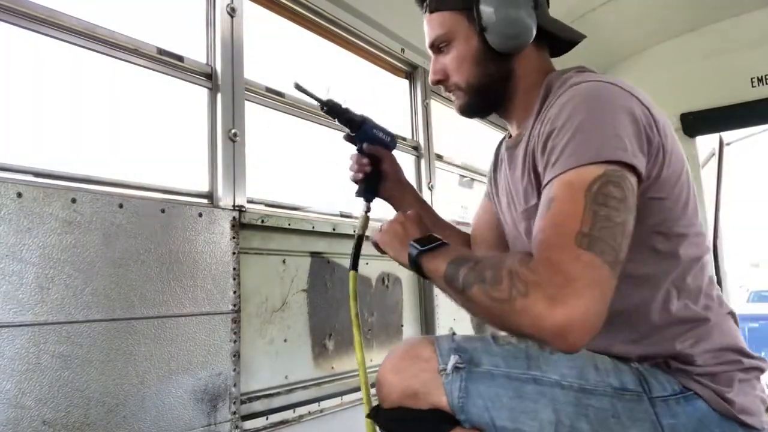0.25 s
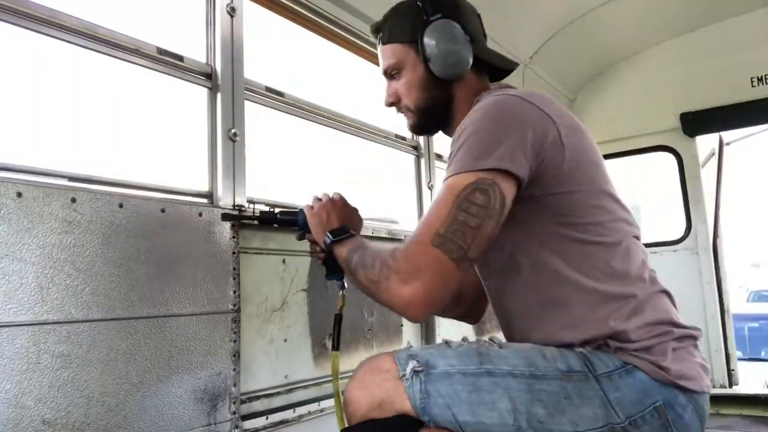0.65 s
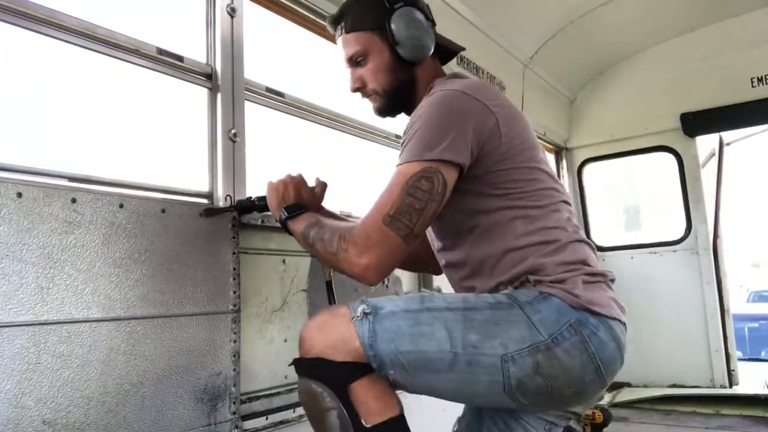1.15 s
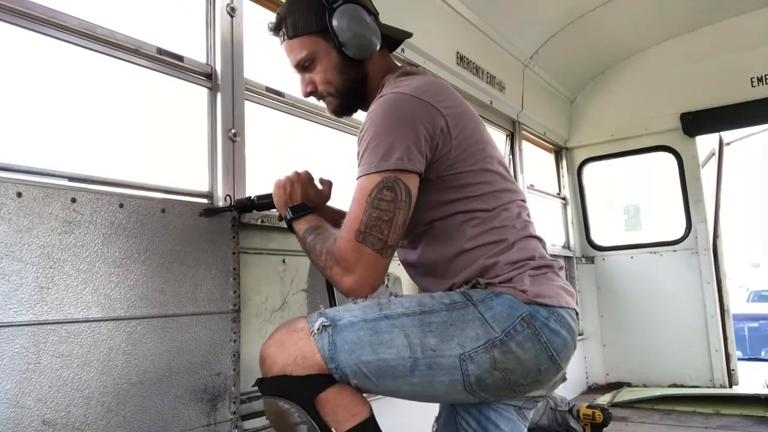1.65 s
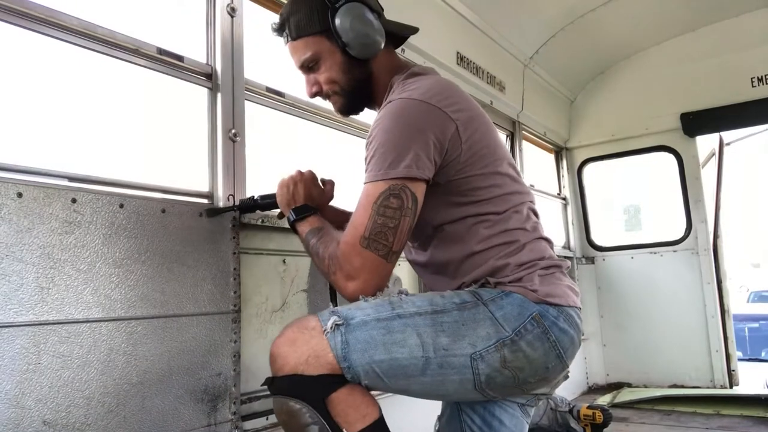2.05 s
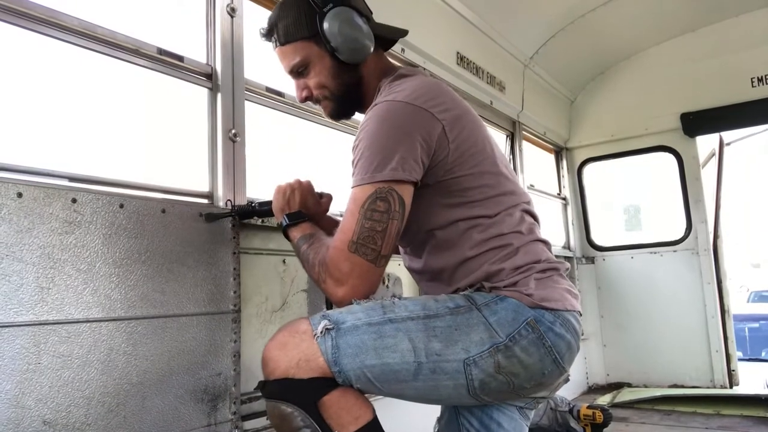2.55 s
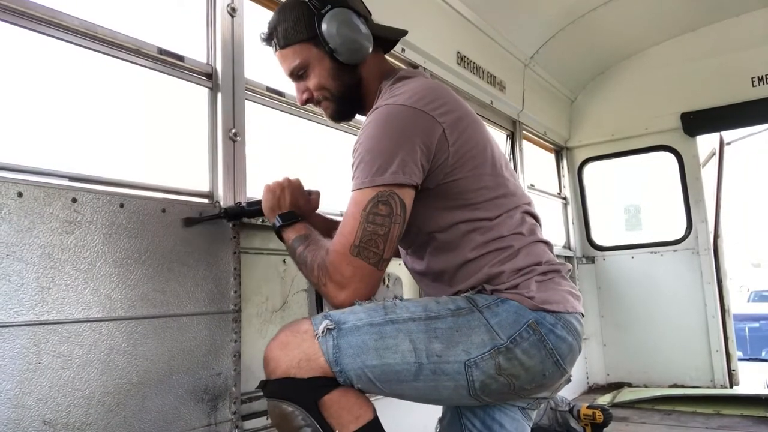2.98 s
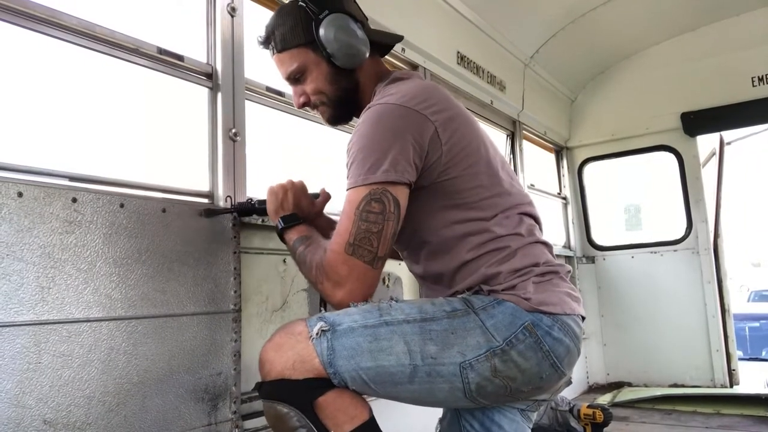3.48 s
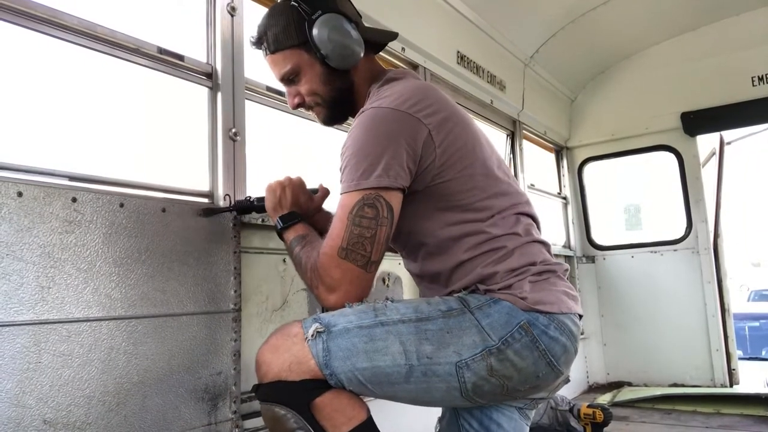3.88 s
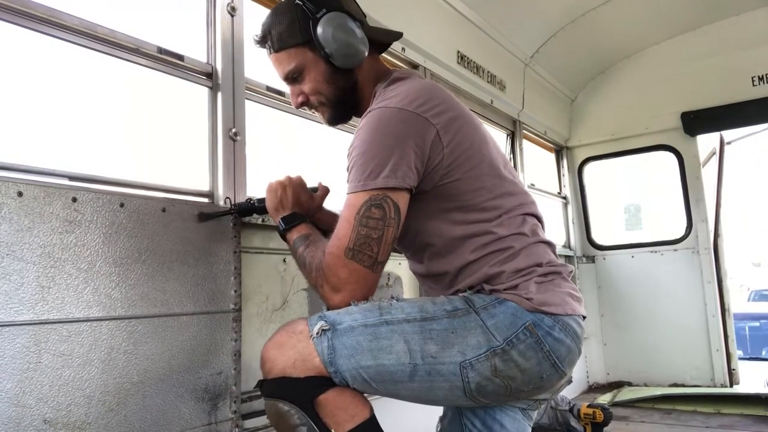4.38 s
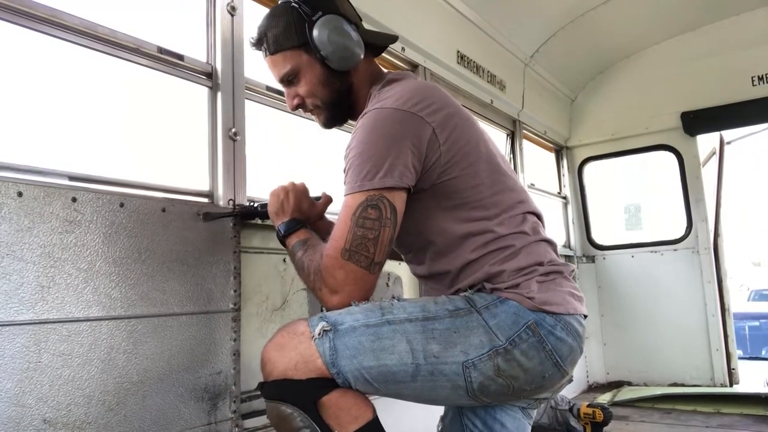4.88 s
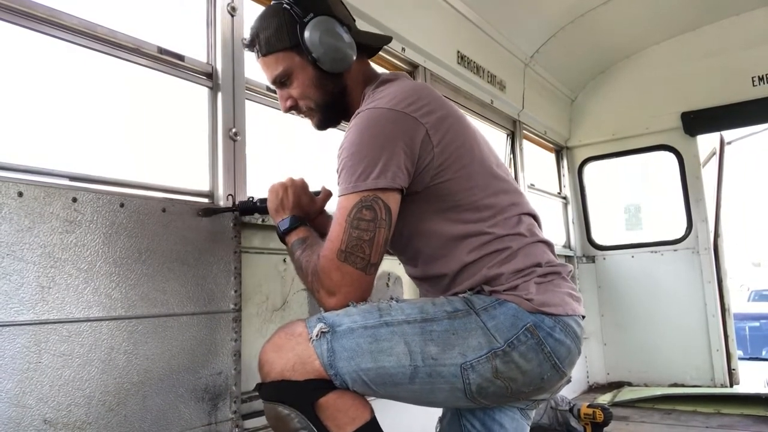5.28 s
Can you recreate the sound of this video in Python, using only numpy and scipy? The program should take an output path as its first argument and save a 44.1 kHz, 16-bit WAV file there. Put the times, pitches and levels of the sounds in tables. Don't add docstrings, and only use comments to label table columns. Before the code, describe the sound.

Quiet handling comes first: soft knocks, small metallic ticks, three clanks and thin air hiss. Then an air chisel hammers steel in six brief, very loud bursts, each blow a hard crack with sheet thud and exhaust puff. Occasional knocks fall in the gaps while bare cabin echoes and panel ringing decay. Close phone microphone with bass trimmed, quiet yard and distant traffic far beneath.

```python
import sys
import numpy as np
from scipy import signal
from scipy.fft import rfft, irfft
from scipy.io import wavfile
from scipy.ndimage import uniform_filter1d

SR = 44100
rng = np.random.default_rng(int(sys.argv[2]) if len(sys.argv) > 2 else 0)


def store_wav(level_fs):
    pcm = np.round(np.clip(np.atleast_2d(level_fs), -1, 1) * 32767)
    wavfile.write(sys.argv[1], SR, pcm.T.astype(np.int16))


def convert_level_to_amplitude(level_db):
    exponent = np.asarray(level_db, float) / 20
    return 10 ** exponent


N = 243873
T = np.arange(N) / SR

# first blow t/s, stroke/ms, blows, crack level/dB, sag/dB per blow
BURSTS = [
    (1.8772, 22., 1, -8, 0),
    (1.902, 18.4, 9.63, -8.5, 0.28),
    (2.9147, 20.75, 8, -5.5, 0),
    (3.0777, 25.3, 2, -12, 1),
    (3.766, 21.5, 10, -3, -0.18),
    (4.2075, 21.3, 9.82, -2, 0.26),
    (4.8108, 20.8, 12, -2, 0),
    (5.0796, 18, 1.4, -8, 3),
    (5.5104, 16.8, 2.26, -1, -3),
]
# thud level/dB, thud drift/dB per blow, exhaust level/dB,
# snap level/dB, snap drift/dB per blow
BIT_GRIP = [(-1, 0, -30, 2, 0), (-4.5, 1., -9.5, -3.5, 0), (-1.5, -0.42, -7.5, 2, 0.9), (-7.5, 4, -7, 3, 4),
            (-3, 0, -6, 4, -3), (-3, -0.08, -8.5, 0.5, -0.46), (-3, 0, -8, 2.5, -0.24), (1, 0, -2.5, 7, 0),
            (.5, -3.5, -2.5, 1, -1)]
STROKE_JITTER_MS, BLOW_SCATTER_DB = 0.9, 1.3
LAST_BLOW_DB, BEFORE_LAST_DB = -3.5, -0.5
STARTLE_DB, STARTLE_MS = 6, 12
# peak t/s, level/dB, swell/dB per ms, fade/dB per ms
PUFFS = [
    (1.854, -8, 5, 3.5),
    (1.866, -6.5, 8.5, 3),
    (2.898, -27, 14.5, 1),
    (2.904, -17, 3, 1.5),
    (3.745, -35.5, 11.5, 1.5),
    (3.756, -17.5, 3, 1),
    (4.201, -27, 2.5, 1.5),
    (4.789, -20.5, 6, 1.5),
    (4.802, -18.5, 3.5, 2),
    (5.5, -22, 3.5, 0.7),
]
# f/Hz, level/dB per Hz
BLOW_COLOUR = [(59, -59.5), (100, -29.5), (134, -10), (270, -8), (333, -6), (448, -4.5), (642, -6.5),
               (845, -6.5), (2010, -11.5), (3270, -7.5), (5900, -15), (9200, -14.5), (15600, -23.5)]
# f/Hz, level/dB per Hz
AIR_COLOUR = [(240, -45.5), (400, -9), (1520, -13), (2160, 1.5), (4940, -2.5), (7030, 2.5), (7950, 2.5),
              (14700, -1.5), (15600, 0)]
SPLIT_HZ = 990
# f/Hz, t60/s, level/dB
WALL_MODES = [(140.6, 0.4, -25), (223, .15, -28), (269, 0.43, -26), (404, 0.51, -25.5), (455.2, 0.29, -23),
              (500., 0.13, -25.5), (558.3, 0.11, -19), (672, 0.021, -22.5), (875.6, 0.087, -21),
              (980, 0.025, -21.5), (2710, 0.03, -26), (3192, 0.008, -20.5), (3665, 0.028, -26.5),
              (9200, .005, -24)]
# f/Hz, t60/s, level/dB
ROOF_MODES = [(133.7, 4.1, -34.5), (165, 4.8, -35.5), (292, 2.4, -38), (344, 4.5, -33), (590, 3.3, -42.5),
              (937., 1.6, -39), (1246, 1.6, -40), (1324, 1.8, -40), (1503, 2.4, -37.5),
              (1588., 3., -45), (1610., 2.5, -48)]

# t/s, sheet level/dB, sheet f/Hz, sheet width/octaves, rattle level/dB
CLANKS = [
    (.541, -29.5, 579, 1, -53),
    (.888, -25.5, 900, 1.6, -28),
    (1.12, -26.5, 520, 2.8, -35),
]
# delay/s, level over its source/dB, centre (share of sheet f, or f/Hz),
# width (share of sheet width, or octaves), contact/ms
STRIKE, SHEET = (0, 8.5, 1.12, 1.1, 11.0), (0.003, 0.5, 0.94, 0.93, 37.4)
RATTLE, CRACK = (0.03, -2, 3400.0, 2.5, 39), (0, 10.5, 2200.0, 2.1, 4.5)
# t/s, level/dB, centre f/Hz, width/octaves
TICKS = [(.232, -35, 1950, 3.), (.33, -45, 3500, 0.22), (.34, -40, 7000, 2.27), (.568, -45.5, 6500, .5),
         (.726, -45, 6000, 2.5), (.829, -38, 2360, 0.81), (.914, -39, 7500, .8), (.94, -38, 13000, .71),
         (.944, -28, 3530, .3), (.968, -25.5, 7010, 0.36), (1.213, -36, 3030, 3.), (1.22, -45, 12000, 1.),
         (1.627, -44, 12000, .8), (1.634, -42.5, 11000, 1.), (1.705, -40.5, 5000, 2.),
         (1.711, -34.5, 9520, 1.), (3.449, -35, 2680, 1.4), (3.682, -40, 890, 1.9)]
TICK_MS_AT_1K, TICK_SLOPE = 12.0, 0.62
# t/s, level/dB, centre f/Hz, width/octaves, contact/ms
THUDS = [(.071, -41, 396, 1.1, 60), (.171, -37.5, 303, 0.57, 20.), (.3, -50, 60, 2., 97),
         (.388, -39.5, 420, 1.4, 20), (.559, -34, 165, 1.4, 70), (.83, -40.5, 700, 1.3, 10),
         (.912, -32, 230, 2.8, 155), (1.15, -22.5, 156, 1.18, 66), (1.862, -21.5, 135, 0.96, 28),
         (2.05, -29.5, 120, 2., 61), (3.05, -26.5, 109.8, 1.7, 74), (1.865, -15, 500, 2., 12),
         (2.17, -43, 70, 1.5, 80), (2.29, -36.5, 250, 3.3, 29), (3.2, -39, 89, 1.1, 34),
         (3.279, -36, 2983, 3, 30.), (3.29, -32.5, 229, 3.1, 80), (3.455, -44, 1510, 0.16, 58),
         (3.46, -38.5, 382, 2.75, 79), (3.55, -47, 110, 1.6, 60.), (5.27, -43, 128, 0.41, 130)]

# peak t/s, rumble level/dB, hiss level/dB,
# swell/dB per s, fade/dB per s
SHIFTS = [
    (0., -44.5, -54, 400, 303),
    (.068, -45, -65, 900, 118),
    (0.211, -38.5, -41.5, 700, 120),
    (.402, -40, -76, 300, 170),
    (1.3, -44, -64.5, 301, 110),
    (1.474, -55, -77.5, 299.5, 200.5),
    (1.555, -53.5, -51, 401, 41.5),
    (1.6, -53.5, -48.5, 220, 220),
    (1.724, -51.5, -58, 300.5, 25.5),
    (1.84, -47, -58, 900, 900),
]
# f/Hz, level/dB per Hz
RUMBLE_COLOUR = [(15, -59), (25, -23), (134, -15), (156, -9), (275, -11.5), (555, -20), (694, -19),
                 (1500, -46), (1950, -72.5), (3300, -120)]
# f/Hz, level/dB per Hz
HISS_COLOUR = [(410, -32.5), (700, -4.5), (1090, -6), (1190, -4), (1380, -7.5), (1720, -6.5), (6880, -13),
               (15600, -21)]
# start t/s, end t/s, f/Hz, width/Hz, level/dB
WHISTLES = [
    (0., .17, 6500., 50., -66),
    (.28, .4, 7900., 70., -69),
    (.655, .885, 3580., 35., -63.5),
    (1.42, 1.55, 3420., 60., -65),
    (1.42, 1.54, 2500., 60., -68),
    (1.72, 1.8, 7900., 80., -68),
]

# f/Hz, early t60/s, late t60/s, late share level/dB
CABIN = [(60., 0.13, 0.39, -19.5), (250., 0.3, 1.03, -4.5), (1000., 0.43, 1.09, -14),
         (4030, 0.39, 0.79, -7.5), (12000., 0.32, 0.66, -19.5)]
CABIN_DB = -3.5
# f/Hz, level/dB per Hz
YARD_COLOUR = [(25, -12.5), (60, -8.5), (156, -1), (340, -8), (600, -20), (1500, -21.5), (3300, -22),
               (5000, -27), (6500, -46), (15600, -74.5)]
YARD_DB = -60.5
# t/s, level/dB
YARD_GAIN = [(0., 3.5), (1.85, 3), (2.4, 0), (2.9, -2), (3.3, 4), (5.5, 0.5)]
# f/Hz, level/dB per Hz
TRAFFIC_COLOUR = [(20, -7.5), (40, 1), (70, -0.5), (140, -36.5)]
MIC_LOW_HZ, MIC_TOP_HZ = 55.0, 15600


def coloured(points):
    hz, db = np.transpose(points)
    f = np.maximum(np.arange(N // 2 + 1) * SR / N, 1)
    gain = convert_level_to_amplitude(np.interp(np.log(f), np.log(hz), db))
    x = irfft(rfft(rng.standard_normal(N)) * gain, N)
    return x / x.std()


def band_noise(low_high_hz, shape):
    band = signal.butter(2, low_high_hz, "band", fs=SR, output="sos")
    return signal.sosfilt(band, rng.standard_normal(shape))


def contact(s, db, swell_db_ms, fade_db_ms):
    i = np.arange(max(int((s - 0.05) * SR), 0), min(int((s + 0.3) * SR), N))
    ms = 1000 * (T[i] - s)
    env = np.zeros(N)
    env[i] = convert_level_to_amplitude(db + np.where(ms < 0, swell_db_ms * ms, -fade_db_ms * ms))
    return env


def ring(x, modes):
    out = 0
    for hz, t60, db in modes:
        r = 1000.0 ** (-1 / (t60 * SR))
        w = 2 * np.pi * hz / SR
        level = convert_level_to_amplitude(db) * 2 * np.sqrt(1 - r) * np.sin(w)
        out = out + level * signal.lfilter([1], [1, -2 * r * np.cos(w), r * r], x)
    return out


def flutter(rate_hz, depth_db):
    k = int(SR / rate_hz)
    steps = np.repeat(rng.standard_normal(N // k + 1), k)
    return convert_level_to_amplitude(depth_db * uniform_filter1d(steps, k)[:N])


def strokes():
    rows = []
    for burst, grip in zip(BURSTS, BIT_GRIP):
        s, ms, count, db, sag_db = burst
        thud_db, thud_drift, exhaust_db, snap_db, snap_drift = grip
        k = np.arange(round(count))
        chance = rng.standard_normal((len(k), 2)) * (k > 0)[:, None]
        at = s + (k * ms + STROKE_JITTER_MS * chance[:, 0]) / 1000
        closing = (k > 0) * np.where(k == k[-1], LAST_BLOW_DB, (k == k[-1] - 1) * BEFORE_LAST_DB)
        startle = STARTLE_DB * np.exp(-1000 * (at - BURSTS[0][0]) / STARTLE_MS)
        crack_db = db - sag_db * k + closing + startle + BLOW_SCATTER_DB * chance[:, 1]
        rows += zip(at, crack_db, thud_db + thud_drift * k, exhaust_db + 0 * k, snap_db + snap_drift * k)
    return rows


def hammer():
    hits = strokes()
    stroke = sum(contact(at + 0.001, db - 7, 14.0, 1.35) for at, db, *_ in hits)
    crack = uniform_filter1d(stroke, size=SR // 400)
    thud = sum(contact(at + 0.00266, db + own - 9.5, 6.6, 0.88) for at, db, own, _, _ in hits)
    exhaust = sum(contact(at + 0.011, db + own - 10.5, 5.3, 1.18) for at, db, _, own, _ in hits)
    snap = sum(contact(at + 0.0013, db + own - 14.5, 14.0, 3.1) for at, db, _, _, own in hits)
    puffs = sum(contact(at, db + 4, up, down) for at, db, up, down in PUFFS)

    steel = coloured(BLOW_COLOUR)
    low = signal.sosfilt(signal.butter(1, SPLIT_HZ, fs=SR, output="sos"), steel)
    high = steel - low
    blows = high / high.std() * crack * flutter(900, 2.5) + low / low.std() * thud
    air = coloured(AIR_COLOUR) * (exhaust + snap + uniform_filter1d(puffs, size=SR // 600))
    port = ring(rng.standard_normal(N) * puffs, [(2270.0, 0.012, -11.5)])
    push = rng.standard_normal(N) * (crack + thud)
    near = port + blows + ring(push, WALL_MODES) + air
    return near, ring(push, ROOF_MODES)


def clank_contacts():
    rows = []
    for s, sheet_db, sheet_hz, wide, rattle_db in CLANKS:
        parts = [(STRIKE, sheet_db, sheet_hz, wide), (SHEET, sheet_db, sheet_hz, wide),
                 (RATTLE, rattle_db, 1, 1), (CRACK, rattle_db, 1, 1)]
        for (delay, over_db, centre, width, ms), db, unit, span in parts:
            rows.append((s + delay, db + over_db, unit * centre, span * width, ms))
    return rows


def knocks():
    ticks = [(s, db, hz, octaves, TICK_MS_AT_1K * (1000 / hz) ** TICK_SLOPE) for s, db, hz, octaves in TICKS]
    out = 0
    for s, db, hz, octaves, ms in THUDS + ticks + clank_contacts():
        edges = np.clip([hz * 2 ** (-octaves / 2), hz * 2 ** (octaves / 2)], 20, 20000)
        x = band_noise(edges, N)
        out = out + x / x.std() * contact(s + 0.002, db - 4, 16.0, 8.7 / ms)
    return out


def scuffs():
    low, high = 0, 0
    for s, low_db, high_db, up, down in SHIFTS:
        drag = convert_level_to_amplitude(np.where(T < s, up * (T - s), down * (s - T)))
        low = low + drag * convert_level_to_amplitude(low_db - 5.0)
        high = high + drag * convert_level_to_amplitude(high_db - 3.5)
    rumble = coloured(RUMBLE_COLOUR) * low * flutter(26, 1.3)
    hiss = coloured(HISS_COLOUR) * high * flutter(70, 2.5)
    return rumble + hiss


def whistles():
    out = 0
    for start, end, hz, width_hz, db in WHISTLES:
        x = signal.lfilter(*signal.iirpeak(hz, hz / width_hz, fs=SR), rng.standard_normal(N))
        fade = np.interp(T, [start - 0.01, start, end, end + 0.026], [0, 1, 1, 0])
        out = out + x / x.std() * convert_level_to_amplitude(db) * fade
    return out


def cabin(x, count=4):
    t = T[:int(1.6 * SR)]
    table_hz, *columns = np.transpose(CABIN)
    echo = 0
    for hz in 40 * 2 ** np.arange(0, 9, 0.5):
        early, late, late_db = (np.interp(np.log(hz), np.log(table_hz), column) for column in columns)
        fall = convert_level_to_amplitude(-60 * t / early) / np.sqrt(early)
        fall = fall + convert_level_to_amplitude(late_db - 60 * t / late) / np.sqrt(late)
        echo = echo + band_noise([hz / 2 ** 0.25, hz * 2 ** 0.25], (count, len(t))) * fall
    echo = echo * np.minimum(t / 0.0078, 1) * np.sqrt(2 * np.log(1000) / SR)
    turns = np.outer(rng.uniform(5, 15, count), T) + rng.random((count, 1))
    spot = np.cos(2 * np.pi * turns)
    spot = spot / np.sqrt(np.sum(spot ** 2, axis=0))
    return signal.fftconvolve(x * spot, echo, axes=1)[:, :N].sum(axis=0)


def yard():
    gain_db = np.interp(T, *np.transpose(YARD_GAIN))
    return coloured(YARD_COLOUR) * convert_level_to_amplitude(YARD_DB + gain_db) * flutter(13, 1.0)


def traffic():
    return coloured(TRAFFIC_COLOUR) * convert_level_to_amplitude(-67) * flutter(4, 2.0)


def scene():
    near, roof = hammer()
    near = near + knocks() + scuffs()
    mix = near + convert_level_to_amplitude(CABIN_DB) * cabin(near) + roof + whistles() + yard() + traffic()
    return mix[None]


def low_pass(x):
    return signal.sosfilt(signal.butter(12, 17000, fs=SR, output="sos"), x)


def record(dry):
    x = signal.sosfilt(signal.butter(2, MIC_LOW_HZ, "high", fs=SR, output="sos"), dry)
    x = 0.85 * np.tanh(x / 0.85)
    x = signal.sosfilt(signal.ellip(8, 0.3, 56, MIC_TOP_HZ, fs=SR, output="sos"), x)
    return low_pass(x)


dry = scene()
out = record(dry)
store_wav(out)
```